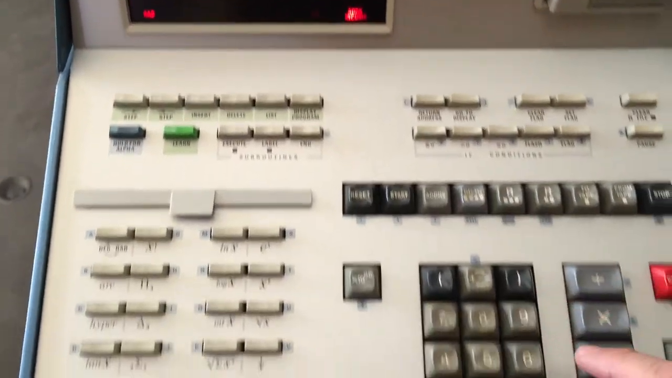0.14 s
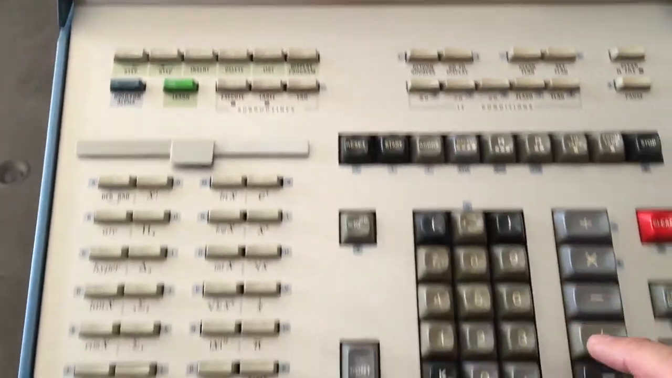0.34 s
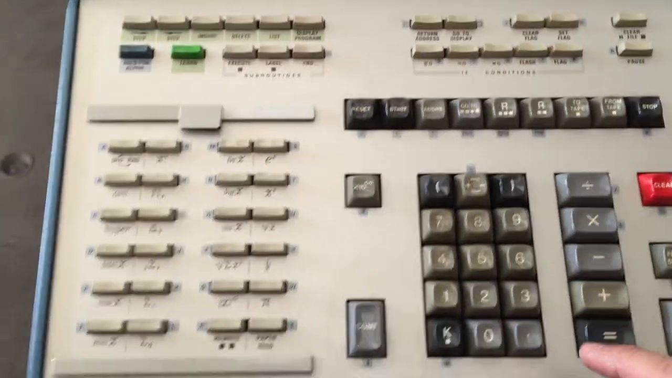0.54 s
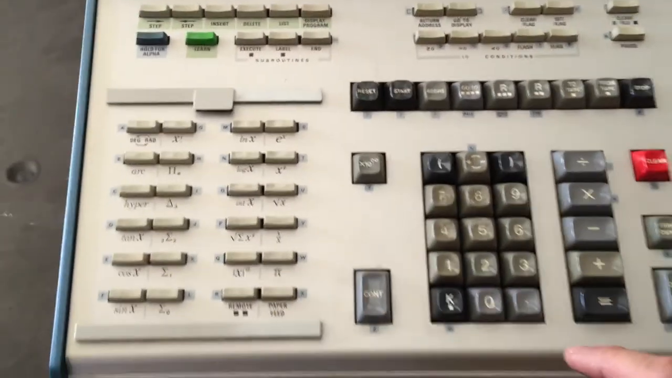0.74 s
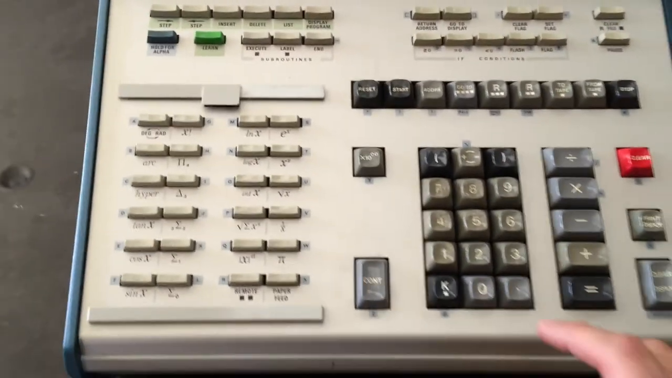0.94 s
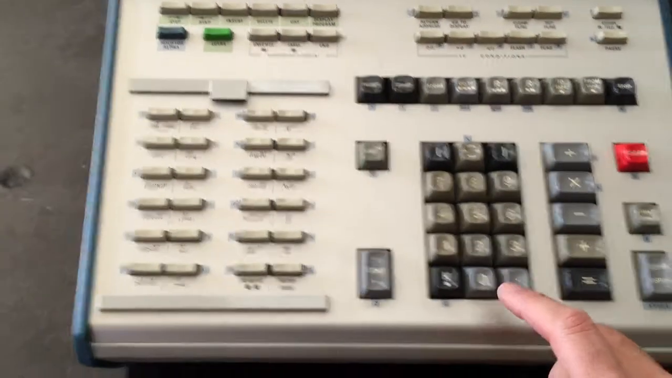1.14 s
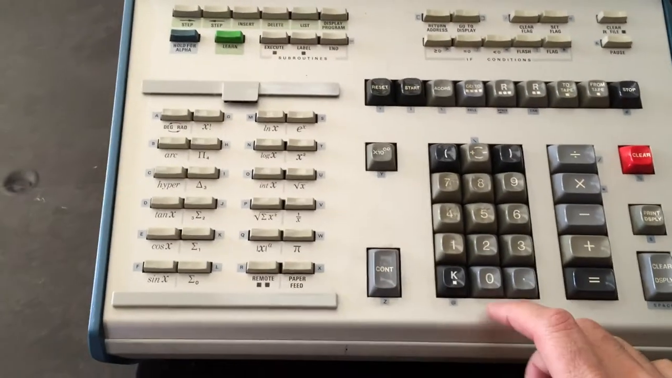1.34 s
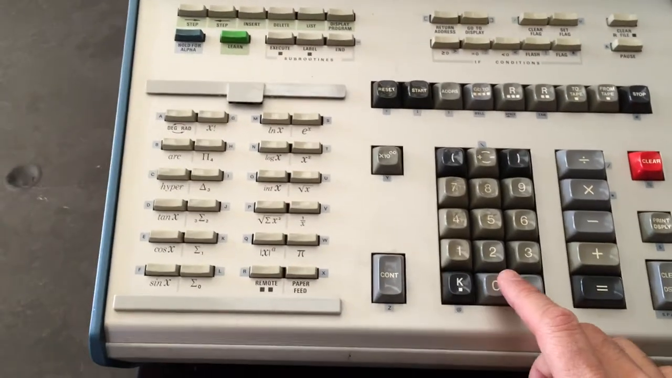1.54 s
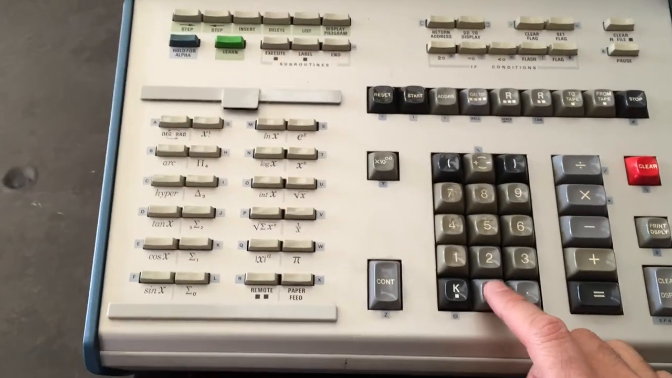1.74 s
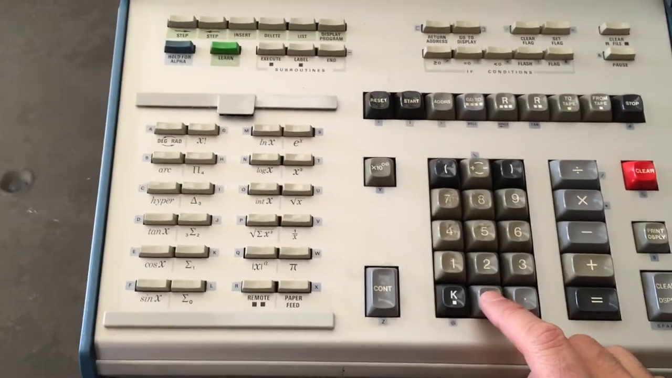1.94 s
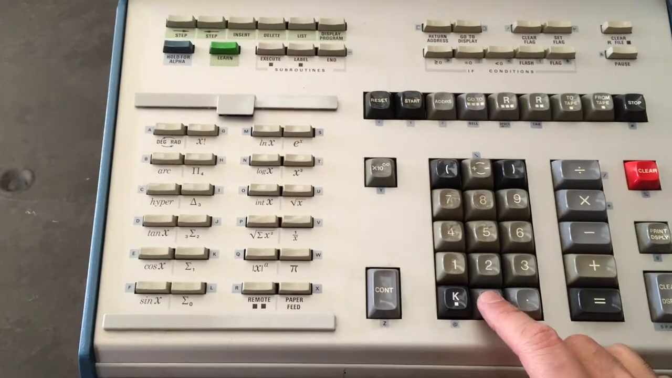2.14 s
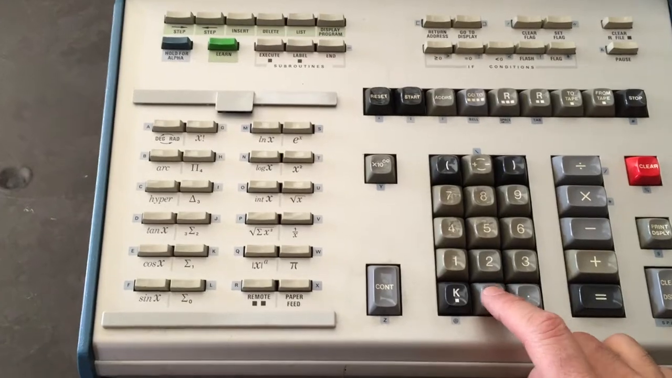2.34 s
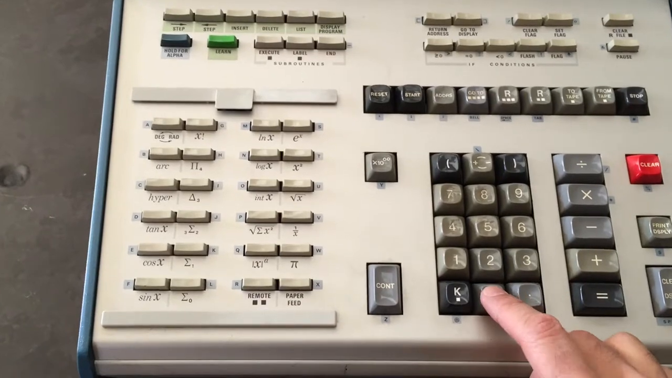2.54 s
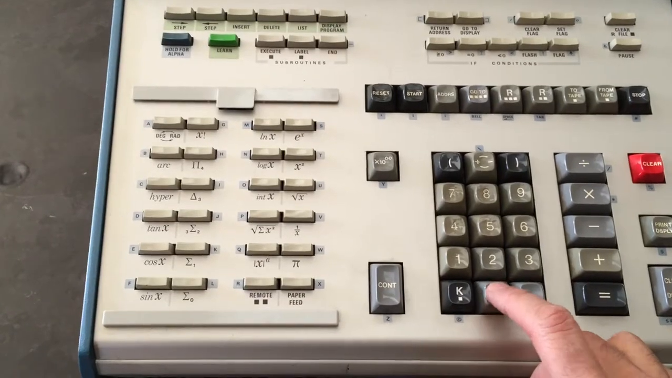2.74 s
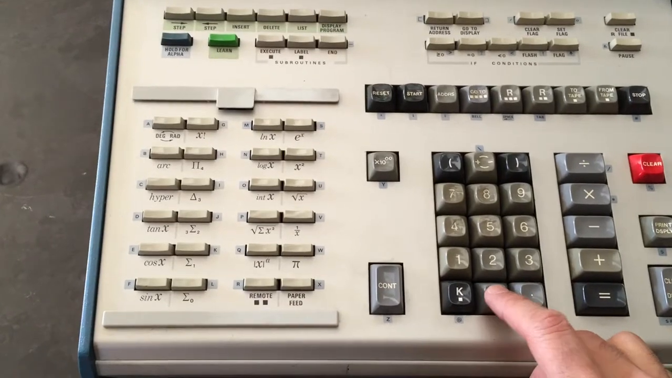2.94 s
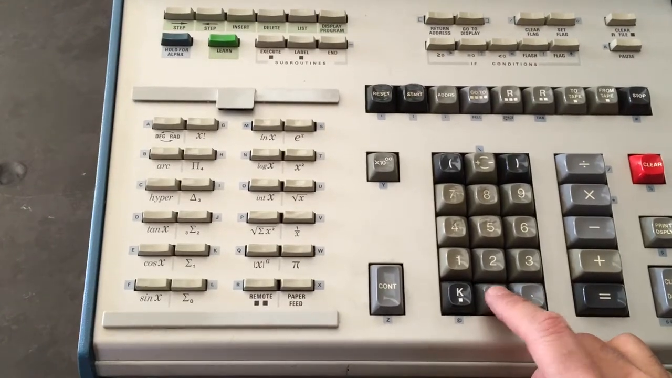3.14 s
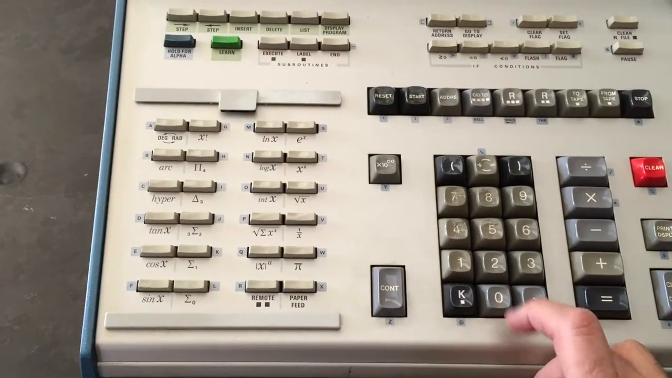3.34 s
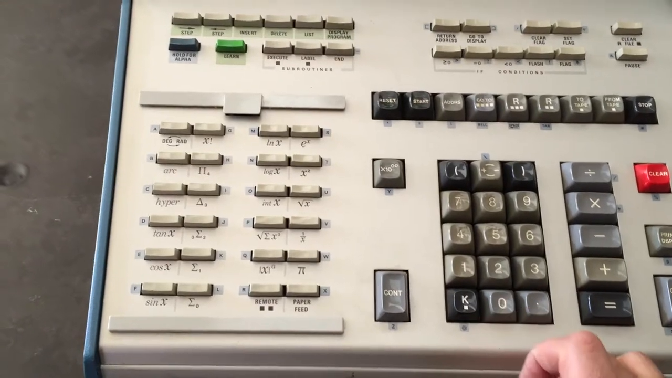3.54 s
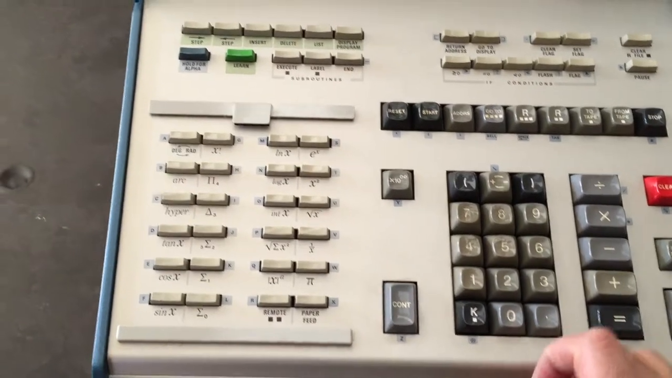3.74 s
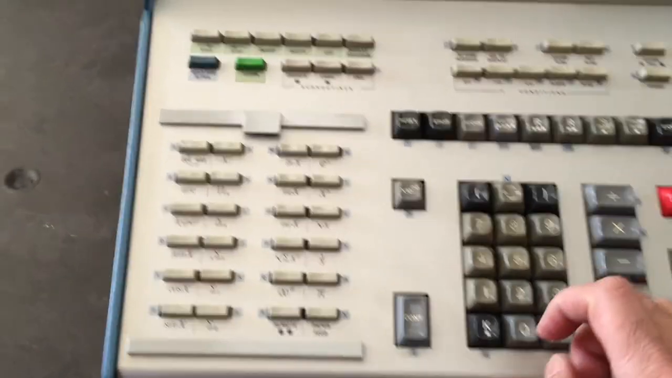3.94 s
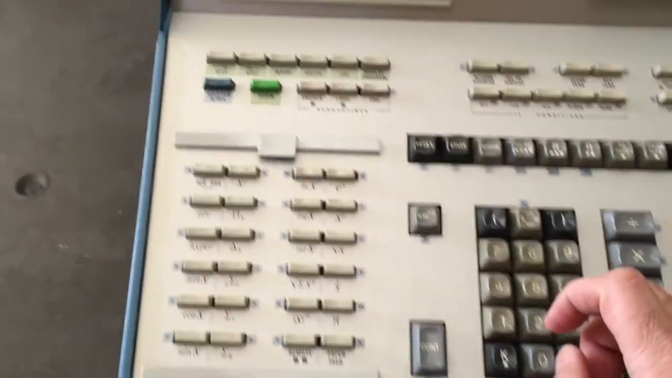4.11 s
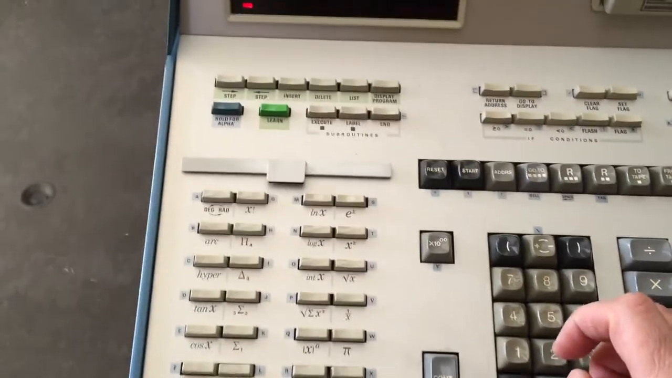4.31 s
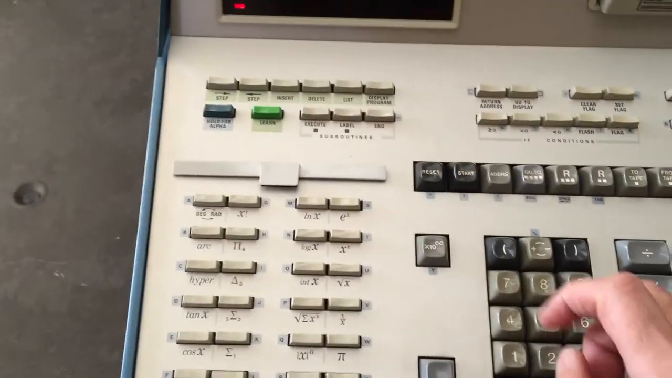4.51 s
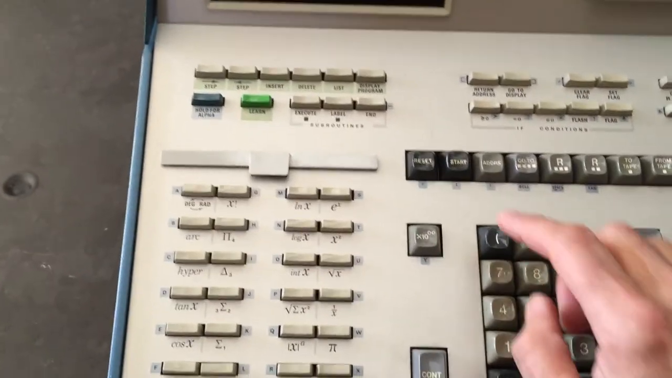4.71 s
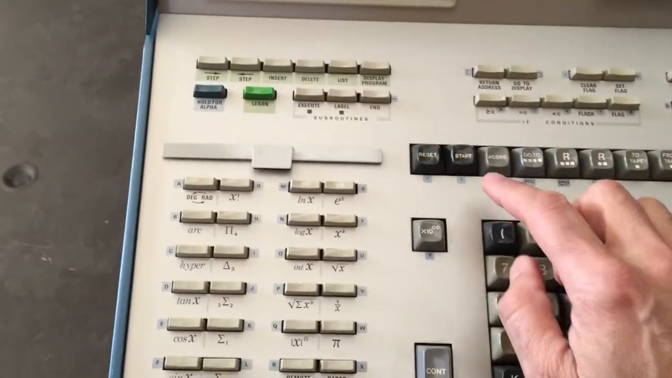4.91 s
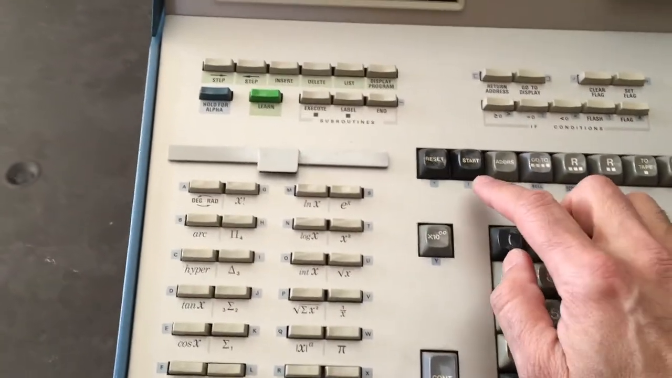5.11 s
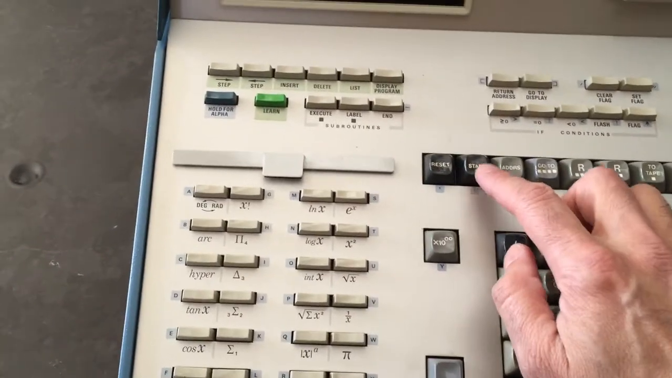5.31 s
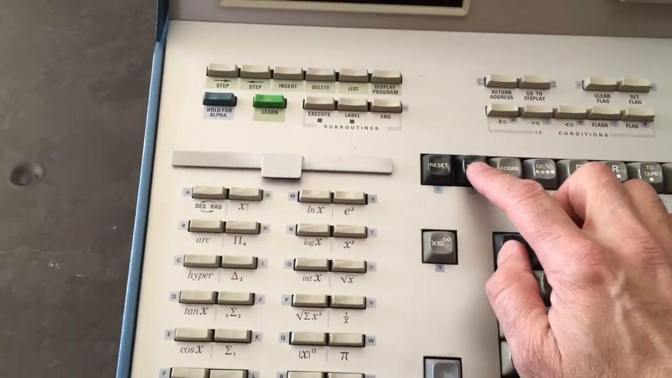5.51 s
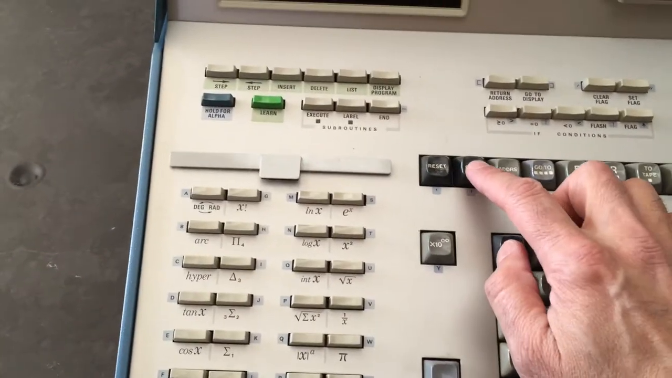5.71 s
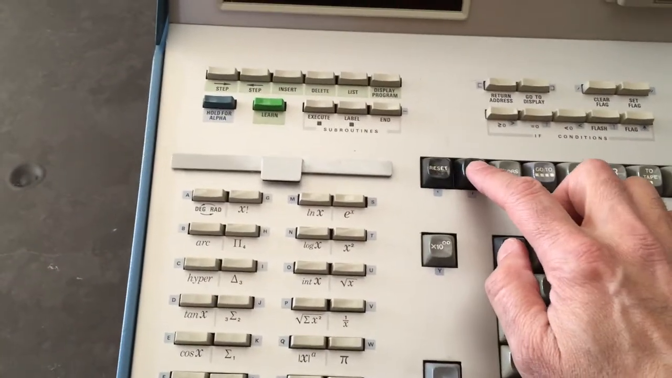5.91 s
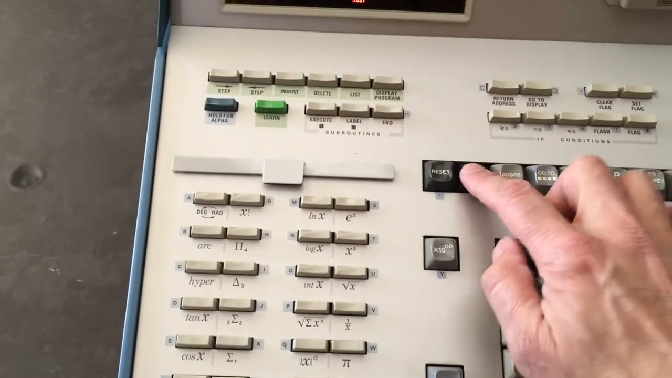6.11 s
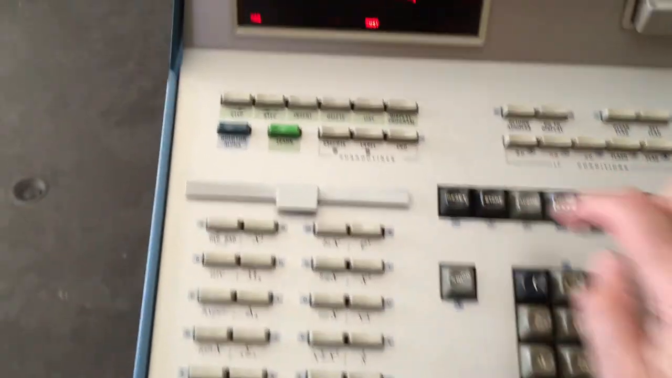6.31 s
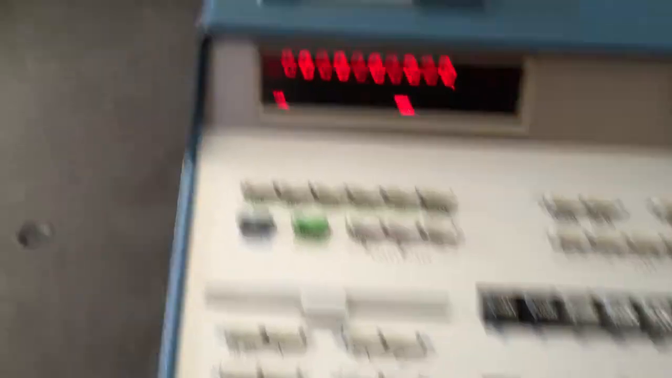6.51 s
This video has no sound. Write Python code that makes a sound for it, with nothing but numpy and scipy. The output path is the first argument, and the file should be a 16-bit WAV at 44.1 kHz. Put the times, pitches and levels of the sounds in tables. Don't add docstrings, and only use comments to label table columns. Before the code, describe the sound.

In a quiet room, an old desktop calculator hums with low airy fan noise and a thin whine. Soft handling bumps come first. Four digit keys are pressed in turn, each a firm plastic clack with a lighter click on release. After a pause with a few dull bumps, a different key is struck much harder, rattling, followed by very faint fast ticks and a slight rising hiss.

```python
import sys
import numpy as np
from scipy import signal
from scipy.fft import rfft, irfft
from scipy.io import wavfile

SR = 44100
rng = np.random.default_rng(int(sys.argv[2]) if len(sys.argv) > 2 else 0)


def amplitude_ratio(level_db):
    exponent = np.asarray(level_db, float) / 20
    return 10 ** exponent


def to_wav(s):
    ch = np.atleast_2d(s).T
    pcm = np.round(np.clip(ch, -1, 1) * 32767)
    wavfile.write(sys.argv[1], SR, pcm.astype(np.int16))


N = 289296

# pitch_hz, t60_s
ROOM_DECAY = [(300, 0.47), (1200, 0.52), (3000, 0.39), (5000, 0.3), (8000, 0.35), (15000, 0.09)]
# peak_s, peak_db, pitch_hz
SQUEAKS = [
    (.27, -81, 3500),
    (1.55, -68, 3370),
]
# pitch_hz, density_db (per Hz)
AIR_RUMBLE = [(30, -27), (50, -4), (68, -3.5), (84, -1.5), (105, -5), (170, -5), (270, 2.5), (330, -4),
              (440, -12.5), (640, -8.5), (780, -18.5), (950, -10.5), (1150, -15.5), (1500, -23.5)]
# pitch_hz, density_db (per Hz)
AIR_HISS = [(900, -37), (1500, -5.5), (1900, -8.5), (2430, -12.5), (3500, -18.5), (4600, -21.5),
            (4900, -24.5), (5500, -21.5), (8000, -26), (10000, -26), (10500, -33), (11200, -27),
            (15800, -30.5)]
# time_s, level_db
VENT_NEARNESS = [(0, 0), (.5, 1.2), (1.55, -0.8), (2.2, -0.3), (3.6, .3), (4.5, -0.4), (6.1, -0.3),
                 (6.56, 3)]
FAN_ORDERS = [10, 14, 16.25, 17.25, 20, 23, 27, 31, 32, 33, 34, 35, 36, 38, 39, 40, 41, 43.3, 56, 66, 67,
              68, 69, 70, 71, 72, 74, 76, 79, 80]
FAN_ORDER_DB = [-70, -78, -73, -53.5, -77, -78, -82, -73, -73, -75, -73, -74, -74, -75, -66, -74, -82, -76,
                -85, -92, -74, -78, -82, -88, -90, -90, -91, -91, -92, -92]
MAINS_HZ = [55.72, 120.03]
MAINS_DB = [-67, -63]
# start_s, peak_db, pitch_hz
HANDLING_THUMPS = [(0.306, -41, 138), (0.356, -45, 229), (0.43, -33, 255), (0.664, -36, 141),
                   (0.8, -36, 242), (.844, -45, 70), (1.049, -35, 221), (3.998, -39, 176),
                   (5.681, -34, 265), (5.899, -48, 81.3), (5.928, -43, 79.5), (6.383, -38, 150)]
# pitch_hz, density_db (per Hz)
PRINTER_COLOUR = [(1470, -27), (2500, -7), (3520, 0.5), (6010, 0.5), (6490, -5), (9370, -3.5), (10500, -4),
                  (12500, -0.5), (15500, -7.5)]
# pitch_hz, level_db, t60_s
DIGIT_PLATE = [(937, -13.5, 0.1), (1127, -8, 0.077), (1620, -15, 0.099), (1828, -11.5, 0.084),
               (2438, -14, 0.08)]
# pitch_hz, level_db, t60_s
TOP_PLATE = [(684, -10.5, 0.067), (883, -4.5, 0.038), (1244, 0.5, 0.054), (1240, -12, 0.015),
             (1430, 0, 0.028), (1810, -3, 0.028), (2340, 0, 0.012), (2590, -2, 0.026), (3100, -32, 0.014),
             (3870, 1, 0.011)]
# pitch_hz, level_db
DIGIT_PLASTIC = [(400, -21), (650, -7.5), (1000, -5.5), (1600, -0.5), (2500, 5), (3800, 5), (5500, -1.5),
                 (8000, -12), (10500, -13.5), (12000, -13.5), (15000, -21)]
# pitch_hz, level_db
TOP_PLASTIC = [(400, -22), (700, -20), (1000, 1), (1500, 8.5), (2200, 3), (2900, 1), (3800, 7.5),
               (5500, -6), (8000, -7.5), (10500, -13.5), (12000, -10), (15000, -17)]
# bottoming_s, peak_db, fingertip_landing_db, stem_tick_db
PRESSES = [
    (2.2417, -18.5, -44, -37),
    (2.6286, -18, -49.5, -32),
    (2.9354, -21.5, -34.5, -41.5),
    (3.2398, -20, -28, -41),
]
# top_stop_s, peak_db, slide_lead_ms, slide_db, second_knock_db
RELEASES = [
    (2.4466, -31, 34, -40.5, -42),
    (2.8029, -28.5, 33, -36, -27),
    (3.0854, -27, 29, -39, -35),
    (3.3684, -26.5, 23, -39.5, -34),
]
# start_s, peak_db
SLIPS = [
    (2.390, -39),
    (3.3285, -35),
    (3.396, -59),
]
# start_s, peak_db, plate_ring_db, brightness_db, scuff_ms
TOP_STROKE = [
    (6.1447, -33, -12, -22, 3.1),
    (6.1494, -8, -15, -20.5, 2.5),
    (6.1525, -18.5, -6, -14, 2.9),
    (6.2835, -23, -3.5, -23.5, 2.7),
    (6.288, -21.5, -4.5, -22.5, 3.2),
    (6.2994, -36, -1, -24, 5.2),
]

# plate_ring_db, brightness_db, scuff_ms
LANDING, TICK, BOTTOM, BOUNCE = (-2, -17, 5.5), (-6, -9.5, 11), (-10.5, -30, 3.2), (-4.5, -42, 3.1)
SLIDE, STOP, KNOCK = (-3.5, -18.5, 18), (-3.5, -25, 7.8), (-6.5, -13.5, 3.7)
SETTLE, SLIP = (-1.6, -23, 5.2), (0.5, -36, 8.3)
UNEVEN_MS = 1.1


def rms_one(x):
    return x / np.sqrt(np.mean(x ** 2) + 1e-20)


def at_hz(points, hz):
    point_hz, value = np.array(points).T
    return np.interp(np.log(hz), np.log(point_hz), value)


def drift(rate_hz):
    r = np.exp(-2 * np.pi * rate_hz * 40 / SR)
    slow = signal.lfilter([1], [1, -2 * r, r * r], rng.standard_normal(N // 40 + 2002))[2000:]
    return np.interp(np.arange(N) / 40, np.arange(len(slow)), rms_one(slow - slow.mean()))


def ring(clicks, hz, t60):
    r, w = amplitude_ratio(-60 / (t60 * SR)), 2 * np.pi * hz / SR
    return signal.lfilter([0, np.sin(w)], [1, -2 * r * np.cos(w), r * r], clicks + 1e-18)


def coloured(spectrum):
    hz = np.maximum(np.fft.rfftfreq(N, 1 / SR), 1)
    low_edge = np.minimum(hz / spectrum[0][0], 1) ** 4
    noise = rfft(rng.standard_normal(N))
    return rms_one(irfft(noise * amplitude_ratio(at_hz(spectrum, hz)) * low_edge, N))


def place(rows, times, size=N):
    length = rows.shape[1]
    out = np.zeros(size + length)
    starts = (np.asarray(times)[:, None] * SR).astype(int)
    np.add.at(out, starts + np.arange(length), rows)
    return out[:size]


def room(x):
    t = np.arange(SR // 2) / SR
    tail = np.zeros(len(t))
    for hz in 250 * 2 ** np.arange(0, 6, 1 / 3):
        band = signal.butter(2, [hz, min(1.26 * hz, .45 * SR)], "band", fs=SR, output="sos")
        decay = amplitude_ratio(-60 * t / at_hz(ROOM_DECAY, 1.12 * hz))
        tail += signal.sosfilt(band, rng.standard_normal(len(t))) * decay
    tail *= (1 - np.exp(-t / 0.0024)) * (1 + 1.86 * np.exp(-t / 0.017))
    return signal.fftconvolve(x, tail / np.sqrt(np.sum(tail ** 2)))[:len(x)]


def squeaks():
    s, peak_db, hz = np.transpose(SQUEAKS)
    t = np.arange(1100) / SR
    tones = np.sin(2 * np.pi * hz[:, None] * t * (1 - .3 * t)) * np.hanning(len(t))
    return place(tones * amplitude_ratio(peak_db)[:, None], s - .012)


def air():
    near_db = np.interp(np.arange(N) / SR, *np.transpose(VENT_NEARNESS))
    rumble = amplitude_ratio(-52.5 + near_db + .9 * drift(9)) * coloured(AIR_RUMBLE + [(5000, -90)])
    return rumble + amplitude_ratio(-71 + 0.16 * near_db) * coloured(AIR_HISS)


def fan():
    t = np.arange(N) / SR
    turns_per_s, slows_per_s = 28.27, .0063
    turn = 2 * np.pi * np.cumsum(turns_per_s - slows_per_s * t) / SR
    beam_s, swing_s = 0.7, 0.18
    aim_db = np.interp(t, [beam_s - swing_s / 2, beam_s + swing_s / 2], [-9, 1.2]) + 1.5 * drift(5)
    out = np.zeros(N)
    for multiple, level_db in zip(FAN_ORDERS, FAN_ORDER_DB):
        whine = multiple > 60
        phase = rng.uniform(0, 2.2 if whine else 2 * np.pi)
        level = amplitude_ratio(level_db + whine * aim_db + 1.4 * drift(3.9))
        out += level * np.sin(multiple * turn + phase + whine * 0.5 * drift(3.4))
    for hz, level_db in zip(MAINS_HZ, MAINS_DB):
        out += amplitude_ratio(level_db) * np.sin(2 * np.pi * hz * t + rng.uniform(0, 2 * np.pi))
    return np.sqrt(2) * out


def thumps():
    s, peak_db, hz = np.transpose(HANDLING_THUMPS)
    turns = np.arange(2000) / SR * hz[:, None]
    knocks = np.sin(2 * np.pi * turns) * turns * np.exp(-turns / 0.49)
    return place(knocks * amplitude_ratio(peak_db + 11.0)[:, None], s - .004)


def printer():
    step_s, step_gap_s = 6.199, 0.0497
    feed_s, feed_gap_s = 6.519, 0.0175
    s = np.r_[step_s + step_gap_s * np.arange(7), feed_s + feed_gap_s * np.arange(3)]
    peak_db = np.repeat([-51.5, -52], [7, 3])
    length_ms = np.repeat([14, 13.3], [7, 3])
    peak_db = peak_db - 1.0 * (s < step_s + 2.5 * step_gap_s)
    t_ms = np.arange(1000) * 1000 / SR
    puffs = np.clip(t_ms / 1.4, 0, 1) * np.clip((length_ms[:, None] - t_ms) / 5.7, 0, 1)
    steps = place(puffs * amplitude_ratio(peak_db - 4.0)[:, None], s) * coloured(PRINTER_COLOUR)
    swell = amplitude_ratio(-64) * np.exp((np.arange(N) - N) / SR / 0.23)
    return steps + amplitude_ratio(11 - 21) * room(steps) + swell * coloured(AIR_HISS)


def packed_modes(body, cycles):
    hz = np.geomspace(400, 15000, 36) * (1 + .02 * rng.standard_normal(36))
    return list(zip(hz, at_hz(body, hz), cycles / hz))


def digit_contacts():
    rows = [(s, db, *SLIP) for s, db in SLIPS]
    for s, db, land_db, tick_db in PRESSES:
        lead_ms = 19 - .15 * (land_db + 40)
        land_plate_db = LANDING[0] + 0.2 * (land_db + 36)
        early_ms, late_ms = UNEVEN_MS * rng.uniform(-1, 1, 2)
        rows += [(s - lead_ms / 1000, land_db, land_plate_db, *LANDING[1:]),
                 (s - (7.5 + early_ms) / 1000, tick_db, *TICK),
                 (s, db, *BOTTOM),
                 (s + (8.2 + late_ms) / 1000, db - 10.5, *BOUNCE)]
    for s, db, lead_ms, slide_db, knock_db in RELEASES:
        first_ms, second_ms = UNEVEN_MS * rng.uniform(-1, 1, 2)
        rows += [(s - lead_ms / 1000, slide_db, *SLIDE),
                 (s, db, *STOP),
                 (s + (6.6 + first_ms) / 1000, knock_db, *KNOCK),
                 (s + (15 + second_ms) / 1000, db - 7.5, *SETTLE)]
    return sorted(rows)


def top_contacts():
    k = np.arange(7)
    gap_ms, slowing = 4.3, 1.3
    delay_ms = np.cumsum(gap_ms * slowing ** k) - gap_ms + UNEVEN_MS * rng.uniform(-1.2, 1, 7)
    s = 6.1575 + delay_ms / 1000
    rattle = [(s[i], -24 - 0.2 * i ** 2, -11, -32 - 17 * i, 2.7) for i in k]
    return sorted(TOP_STROKE + rattle)


def key(contacts, modes, level_db, strike, grit_db, scatter_db, case_db):
    s, peak_db, plate_db, bright_db, scuff_ms = np.transpose(contacts)
    t_ms = np.arange(1400) * 1000 / SR
    impacts, unevenness = rng.standard_normal((2, len(s), len(t_ms)))
    mode_scatter = amplitude_ratio(scatter_db * rng.standard_normal((len(modes), len(s))))
    last_ms = np.clip(scuff_ms, .2, 10)[:, None]
    envelope = np.exp(-t_ms / last_ms) * (1 - np.exp(-t_ms / (0.089 * last_ms)))
    scuffs = impacts * amplitude_ratio(grit_db * unevenness) * envelope
    scuff_size = np.sqrt(np.sum(scuffs ** 2, axis=1, keepdims=True))
    scuffs[:, :3] += strike / last_ms * scuff_size * [.5, 1, .5]
    scuffs /= np.sqrt(np.sum(scuffs ** 2, axis=1, keepdims=True))

    size = int((np.ptp(s) + .6) * SR)
    direct, blows = np.zeros((2, size))
    for k, (hz, mode_db, t60) in enumerate(modes):
        plate_share = np.clip(np.log2(1400 / hz) * 4, 0, 1)
        cap_share = np.clip(np.log2(hz / 3000), 0, 1.3)
        colour_db = plate_share * (plate_db + 9.0) + cap_share * (bright_db + 24)
        gain = amplitude_ratio(peak_db + level_db + mode_db + colour_db)
        sign = (-1) ** k
        strikes = place(scuffs * (gain * mode_scatter[k])[:, None], s - s[0], size)
        direct += sign * ring(strikes, hz, t60)
        clicks = place(gain[:, None], s - s[0], size)
        blows += sign * ring(clicks, hz, min(t60, 10 / hz)) * amplitude_ratio(-1.5 * np.log2(hz / 1500))
    return place((direct + amplitude_ratio(case_db) * room(blows))[None], s[:1])


def scene():
    background = squeaks() + air() + fan() + thumps() + printer()
    digits = key(digit_contacts(), DIGIT_PLATE + packed_modes(DIGIT_PLASTIC, cycles=22.1),
                 level_db=-10.0, strike=1.68, grit_db=2.0, scatter_db=2.0, case_db=7.0)
    top = key(top_contacts(), TOP_PLATE + packed_modes(TOP_PLASTIC, cycles=16.6),
              level_db=-10, strike=1.15, grit_db=2.5, scatter_db=1.83, case_db=-1.0)
    return (background + digits + top)[None]


def band_limit(x):
    return signal.sosfilt(signal.butter(12, 16270, fs=SR, output="sos"), x)


def record(dry):
    low_pass = signal.ellip(12, .5, 60, 15300, fs=SR, output="sos")
    mix = signal.sosfilt(low_pass, dry)
    return band_limit(mix)


dry = scene()
out = record(dry)
to_wav(out)
```